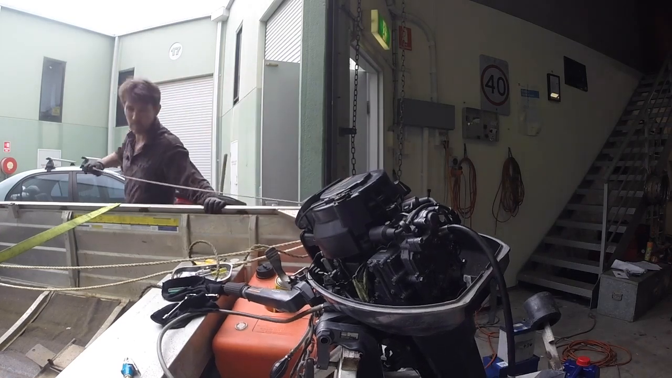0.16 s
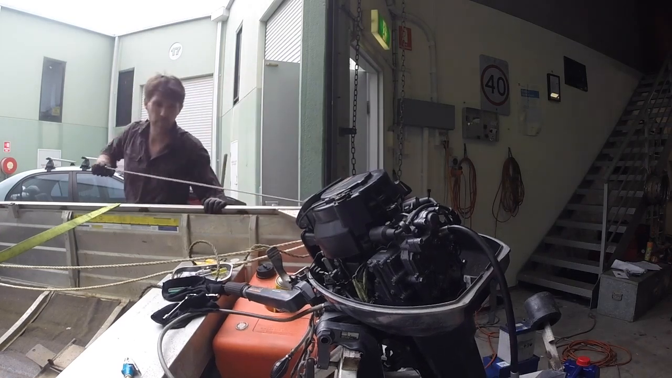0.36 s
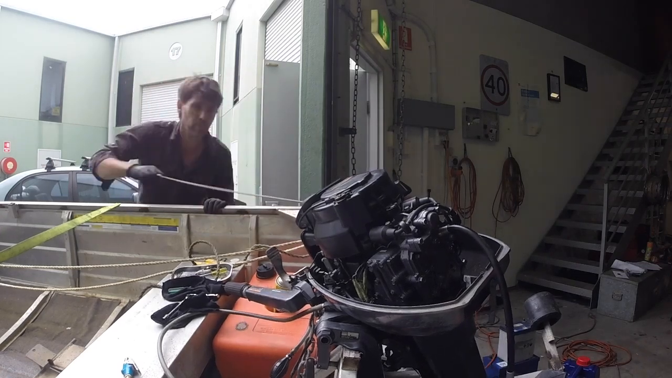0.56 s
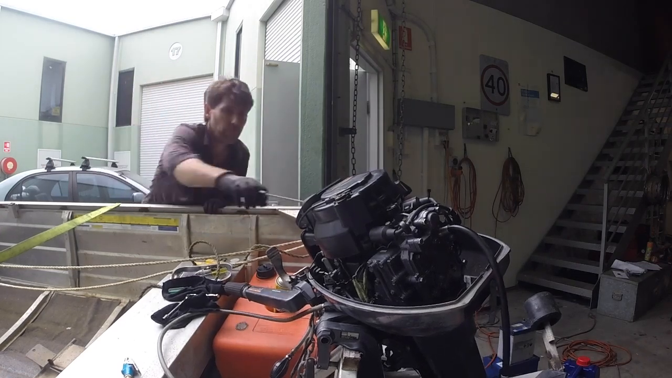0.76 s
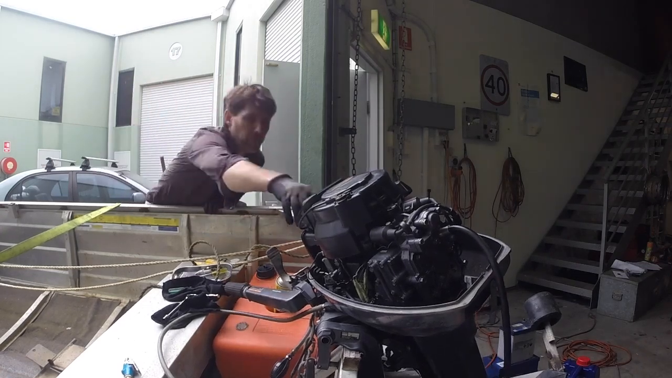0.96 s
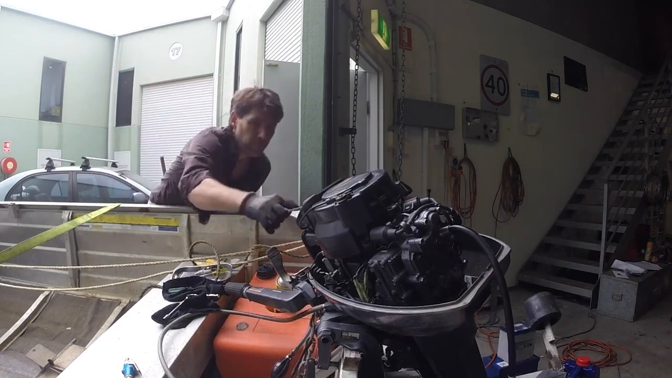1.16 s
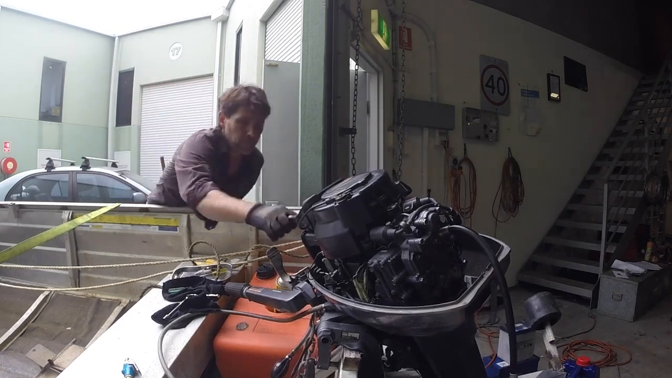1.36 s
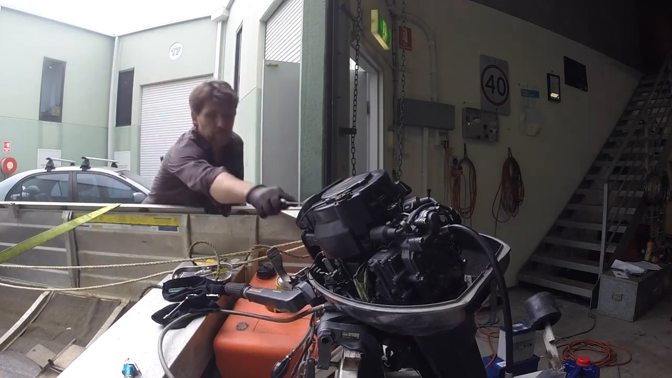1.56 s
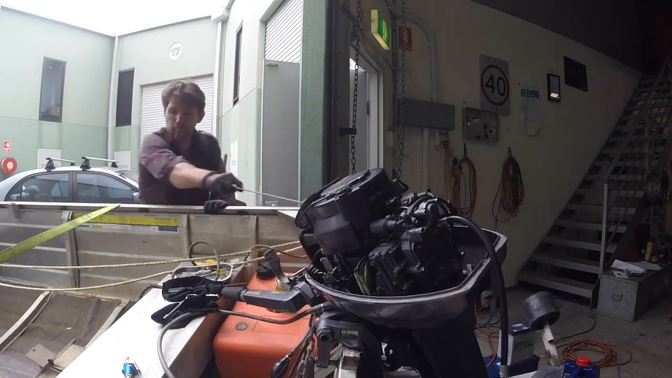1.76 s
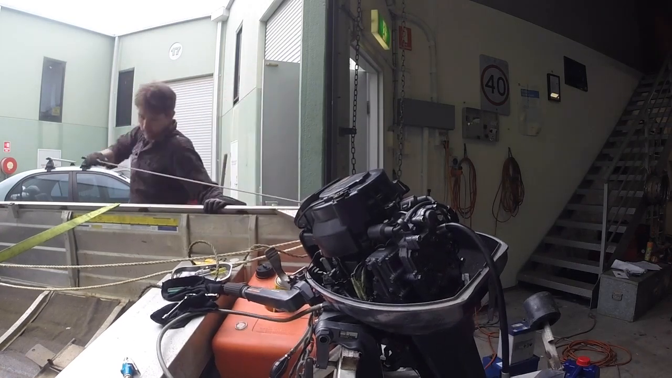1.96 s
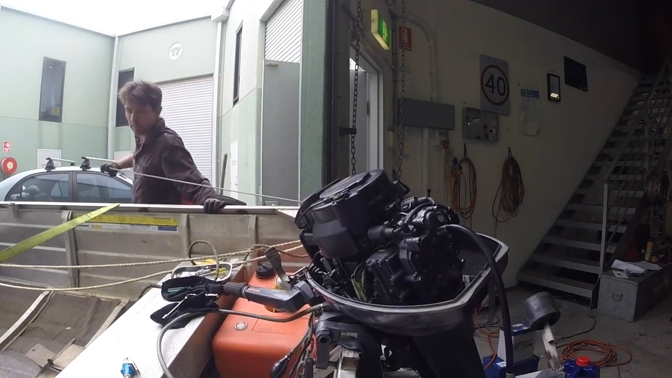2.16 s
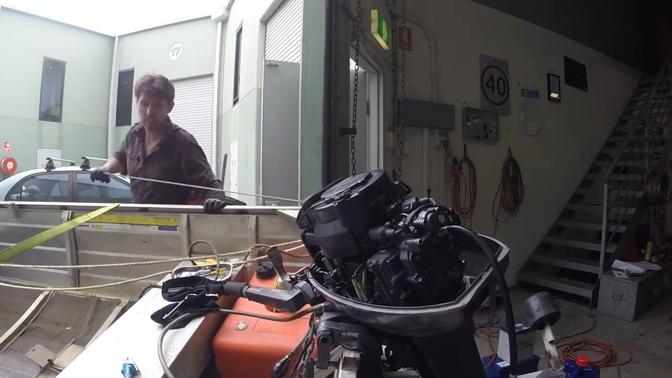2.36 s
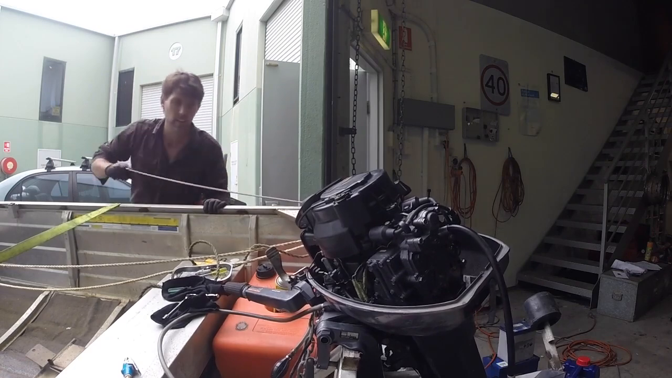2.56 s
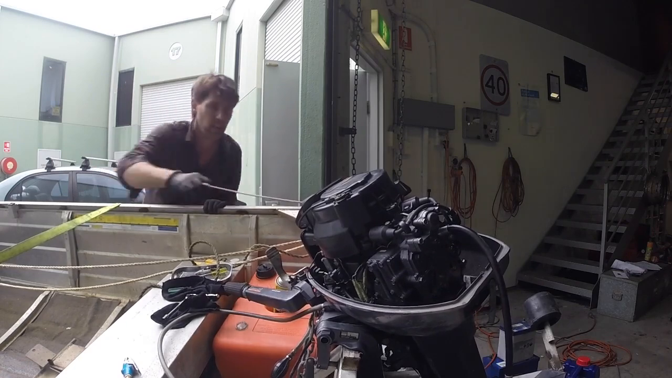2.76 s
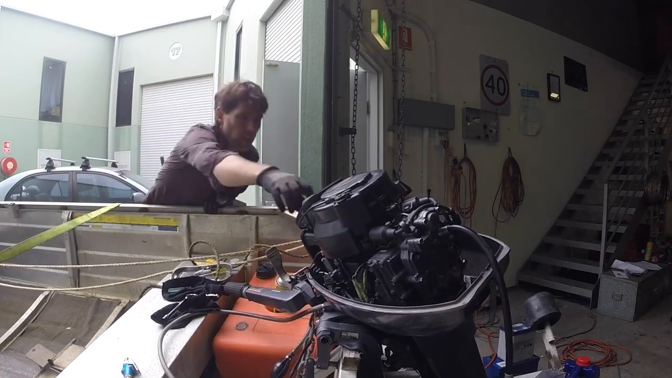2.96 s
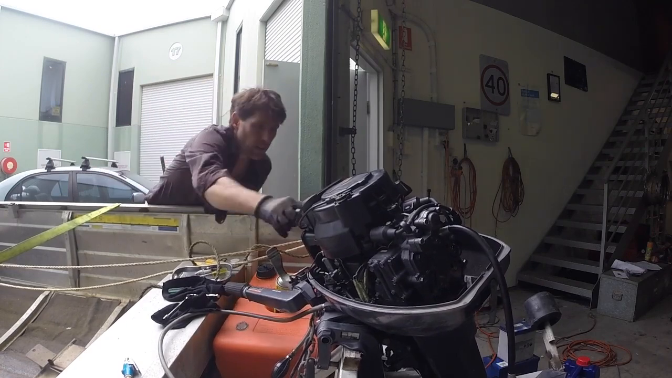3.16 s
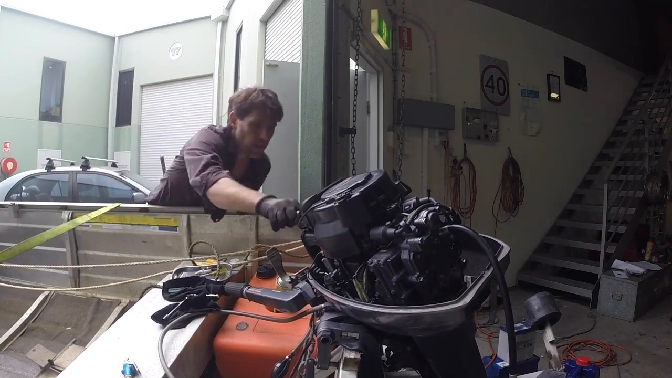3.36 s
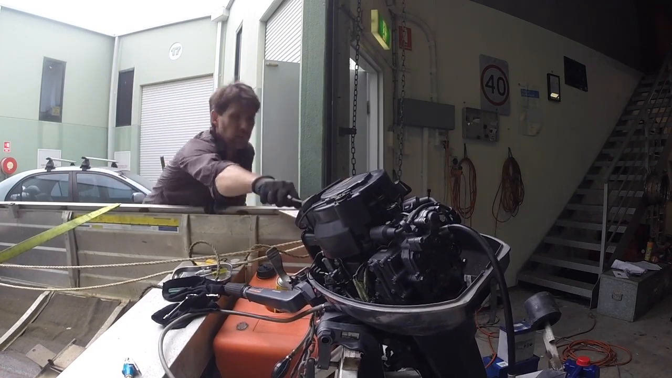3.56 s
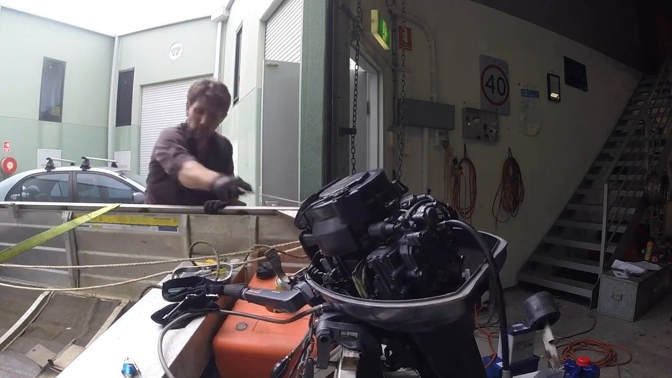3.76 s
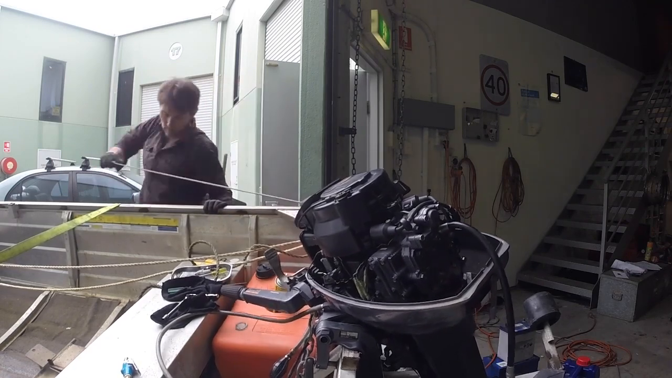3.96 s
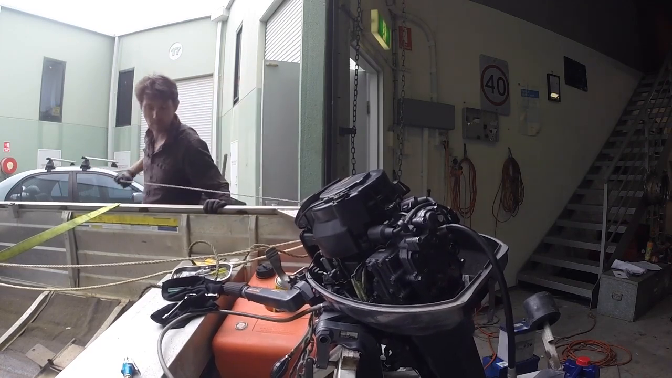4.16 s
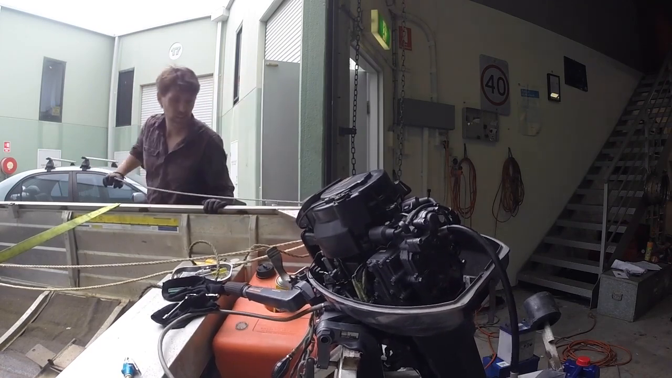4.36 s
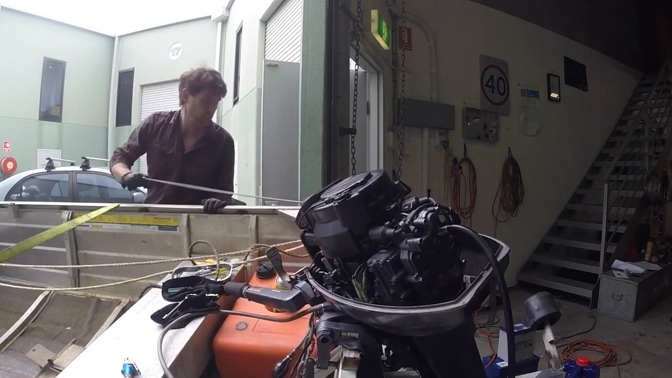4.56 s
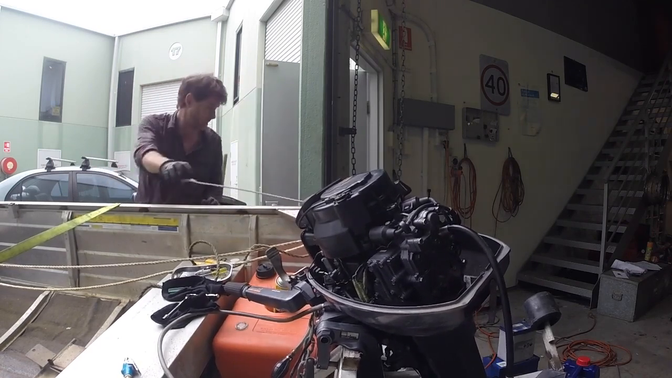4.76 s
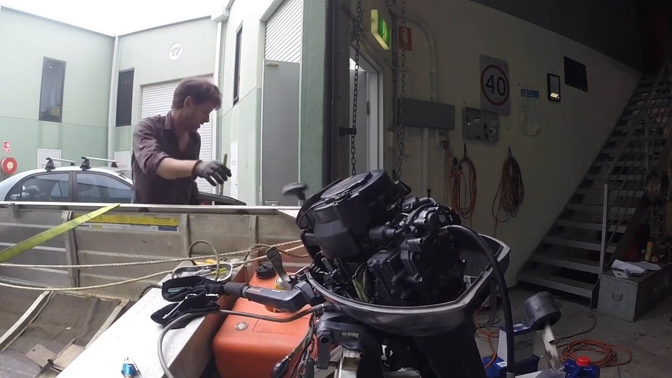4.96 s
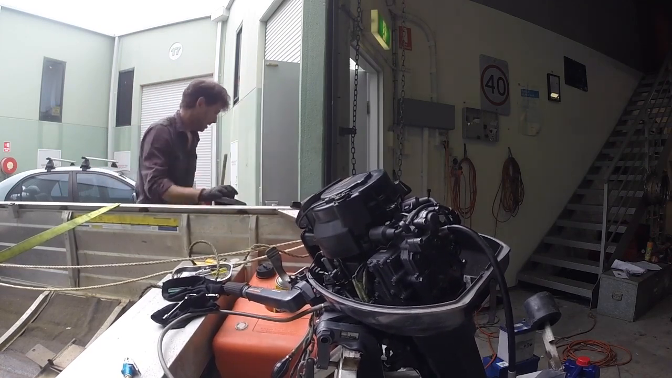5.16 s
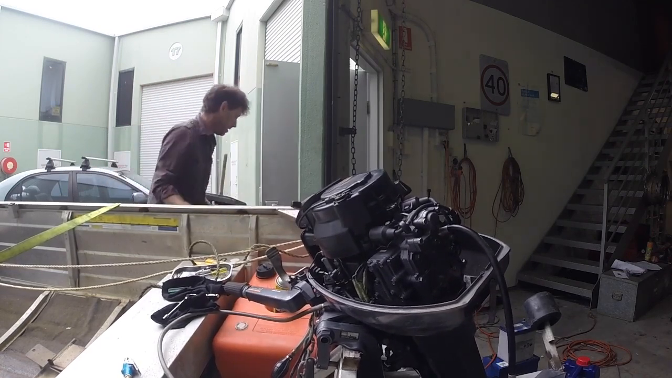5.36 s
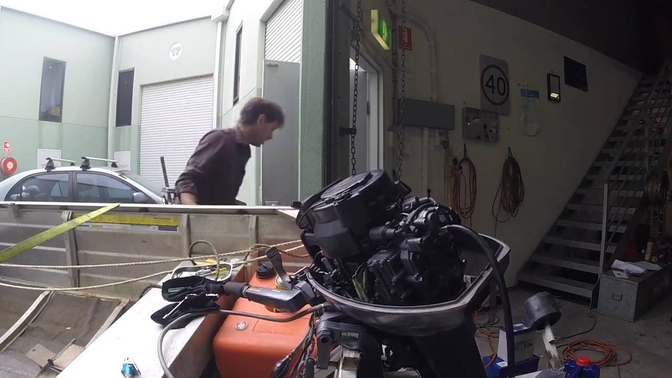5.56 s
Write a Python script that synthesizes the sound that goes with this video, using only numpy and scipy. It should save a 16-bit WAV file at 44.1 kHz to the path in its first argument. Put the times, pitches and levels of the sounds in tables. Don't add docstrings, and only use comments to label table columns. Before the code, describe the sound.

Three half-second starter-rope pulls, about two seconds apart, each with rapid pawl clacks, low compression pulses, dry bearing whine and a hard jolt. Between them come quieter rope and spring rattles, tiny jingles, brief squeaks and soft air sighs. The engine stays dead. A last hiss and a clunk ring on hull panels. Small close microphone, slightly overloaded, short hard-walled echo, faint yard rumble.

```python
import sys
import numpy as np
from scipy import signal
from scipy.fft import rfft, irfft, next_fast_len
from scipy.io import wavfile

SR = 44100
rng = np.random.default_rng(int(sys.argv[2]) if len(sys.argv) > 2 else 0)


def digitize_waveform(pressure):
    field = np.atleast_2d(pressure).T
    bounded = np.clip(field, -1, 1)
    quanta = np.round(bounded * 32767).astype(np.int16)
    wavfile.write(sys.argv[1], SR, quanta)


def gain_from_db(level_db):
    decades = np.asarray(level_db, float) / 20
    return 10 ** decades


N = 248139

# f/Hz, level/dB
AIR_SPECTRUM = [(29, -53), (50, -33), (177, -35.5), (285, -27.5), (449, -9.5), (1110, -9), (1220, -9.5),
                (2280, -14), (2960, -12), (5770, -22), (15000, -50.5)]
# t/s, peak level/dB, rebound delay/s, rebound level/dB
ROPE_JOLTS = [
    (0.163, -10, 0.0086, -4),
    (2.202, -8, 0.0058, -7),
    (4.239, -7, 0.0051, -8),
]
# t/s, clack level/dB, chuff level/dB, chuff f/Hz
CRANK_TURNS = [(0.024, -12, -30.5, 114), (0.1002, -5.5, -20, 133), (0.179, -25, -28, 125),
               (0.2829, -13, -18, 222), (2.02, -10.5, -13, 161), (2.108, -8, -14.5, 134),
               (2.1807, -10, -31.5, 129), (2.2567, -12, -29.5, 141), (2.353, -14.5, -20, 135),
               (2.5048, -20, -22, 164), (4.044, -13.5, -20.5, 144), (4.134, -19, -23, 122),
               (4.213, -11, -19, 122), (4.298, -10.5, -19, 151), (4.403, -45, -24, 171),
               (4.539, -55.5, -23, 154)]


def rms_one(x):
    return x / np.sqrt(np.mean(x ** 2) + 1e-20)


def in_time(tables, fade_s):
    t, gate = np.arange(N) / SR, np.zeros(N)
    for rows in tables:
        start = rows[0][0] if rows[0][0] > 0 else -1
        inside = np.minimum(t - start, rows[-1][0] - t)
        gate = np.maximum(gate, np.clip(inside / fade_s + .5, 0, 1))
    s, *columns = np.transpose([row for rows in tables for row in rows])
    s = s + 1e-6 * np.arange(len(s))
    return gate, [np.interp(t, s, c) for c in columns]


def drift(rate):
    r = np.exp(-2 * np.pi * 20 * rate / SR)
    slow = signal.lfilter([1], [1, -2 * r, r * r], rng.standard_normal(N // 20 + 2002))[2000:]
    return np.interp(np.arange(N) / 20, np.arange(len(slow)), rms_one(slow))


def resonance(x, hz, width_hz):
    r = np.exp(-np.pi * width_hz / SR)
    zeros = np.array([1, 0, -1]) * (1 - r * r) / 2
    return signal.lfilter(zeros, [1, -2 * r * np.cos(2 * np.pi * hz / SR), r * r], x + 1e-18)


def colour(x, spectrum):
    size = next_fast_len(N)
    hz = np.arange(1, size // 2 + 2) * SR / size
    points = np.array(spectrum)
    gain_db = np.interp(np.log(hz), np.log(points[:, 0]), points[:, 1])
    return irfft(rfft(x, size) * gain_from_db(gain_db), size)[:N]


def contacts(per_s, spread_db, smooth):
    sizes = gain_from_db(spread_db * np.minimum(rng.exponential(1, N), 5)) * rng.choice([-1, 1], N)
    return rms_one(sizes * (rng.random(N) < per_s / SR)) + smooth * rng.standard_normal(N)


def follow(law, control_db, load):
    slow = np.minimum(control_db, 0)
    return [db + per_db * control_db - bend * slow ** 2 + load_db * load
            for db, per_db, bend, load_db in law]


def played(x, gate, levels, edges_hz, patchy_db, flicker, shared, closing, top_db):
    last = levels[-1]
    levels = levels + [last + top_db + closing * (last - last.max())]
    out, together, size = 0, drift(flicker), next_fast_len(N)
    hz, whole = np.arange(1, size // 2 + 2) * SR / size, rfft(x, size)
    above = [1 / (1 + (edge / hz) ** 7) for edge in edges_hz]
    for low, high, level_db in zip(above, above[1:], levels):
        part = irfft(whole * (low - high), size)[:N]
        patches = gain_from_db(patchy_db * (shared * together + drift(flicker)))
        out = out + gain_from_db(level_db) * rms_one(part * patches)
    return np.sqrt(gate) * out


def body(x, modes, loose_db, flicker):
    out = x
    for hz, width, db in modes:
        mode = resonance(resonance(x, hz, width), hz, width)
        out = out + gain_from_db(db + loose_db * drift(flicker)) * mode
    return out


def struck(s, db, hz, t60, rise_s):
    t = np.arange(int(min(t60, .4) * SR)) / SR
    return int(s * SR), gain_from_db(db - 60 * t / t60) * (1 - np.exp(-t / rise_s)) * np.sin(2 * np.pi * hz * t)


def add(out, at, x):
    out[at:at + len(x)] += x[:N - at]


def background():
    # f/Hz, level/dB
    yard_spectrum = [(29, -46), (50, -5), (214, -0.5), (279, -5), (1220, -18.5), (1520, -15.5),
                     (1670, -16.5), (2330, -29), (15000, -39)]
    return gain_from_db(-62.5) * rms_one(colour(rng.standard_normal(N), yard_spectrum))


def yard(x):
    t60_s, wall_cut_hz = 0.64, 1460
    size = next_fast_len(N + SR)
    w = 2 * np.pi * np.arange(size // 2 + 1) / size
    dull = 1 / (1 + 1j * w * SR / (2 * np.pi * wall_cut_hz * 2.1))
    loops = 0
    for k, lag in enumerate(rng.uniform(.02, .06, 10) * SR):
        back = gain_from_db(-60 * lag / SR / t60_s) * dull * np.exp(-1j * w * int(lag))
        loops = loops + (-1) ** k * back / (1 - back)
    return irfft(rfft(x, size) * loops, size)[:N]


def hull():
    # f/Hz, level/dB, decay time T60/s
    panels = [(534, -39, .36), (828, -27.5, 0.25), (991, -27, 0.66), (1520, -34, .7), (1920, -43.5, 0.86),
              (2316, -36, 0.84), (2720, -47.5, 0.82), (3480, -40.5, 0.6), (3890, -42, 0.69),
              (4640, -42.5, 0.67), (5460, -47, 0.67)]
    drop_s, bounce_s = 5.114, .125
    t = np.arange(N) / SR - drop_s
    skitter = contacts(per_s=900, spread_db=2.5, smooth=.3) * (t > 0) * (t < bounce_s)
    out = 0
    for hz, db, t60 in panels:
        width_hz = np.log(1000) / np.pi / t60
        for near in 1 + .055 * rng.standard_normal(12):
            out = out + gain_from_db(db + 15.0) * resonance(skitter, hz * near, width_hz)
    return resonance(resonance(out, 1180, 3300), 1200, 3200)


def squeak():
    # t/s, length/s, level/dB, swell/dB
    squeaks = [
        (.443, 0.044, -31.5, 3),
        (0.557, 0.04, -25.5, -29),
        (1.778, 0.074, -30.5, 0),
        (3.795, 0.0173, -38.5, 0),
        (3.833, 0.024, -32, -3),
    ]
    passages = [[(s, db), (s + length, db + swell_db)] for s, length, db, swell_db in squeaks]
    gate, (level_db,) = in_time(passages, fade_s=0.0032)
    hz = 553 * (1 + 0.006 * drift(42))
    return np.sqrt(2) * gate * gain_from_db(level_db) * np.sin(2 * np.pi * np.cumsum(hz) / SR)


def jingles():
    # t/s, peak level/dB, f/Hz
    flicks = [(.462, -37, 11300), (.468, -42, 13200), (.47, -44, 10600), (.484, -40, 5470),
              (.485, -45, 6700), (.55, -39, 4700), (.556, -54, 8300), (.56, -48, 10900), (.634, -46, 5770),
              (.70, -47, 7200), (.744, -34, 4720), (.745, -41, 10900), (.766, -44, 14000),
              (.77, -43, 12500), (.838, -36, 3230), (.838, -40, 3800), (.869, -42, 6000), (.87, -50, 8500),
              (.88, -50, 11000), (.963, -40, 11400), (.963, -34, 7460), (0.981, -32, 6200),
              (1.243, -35, 2870), (1.243, -41, 6070), (1.257, -29, 3140), (1.257, -40, 7000),
              (1.296, -34, 3100), (1.298, -46, 5300), (1.778, -50, 6800), (1.785, -53, 11400),
              (1.79, -50, 3000), (1.81, -50, 6600), (2.704, -47, 6300), (2.775, -38, 10800),
              (2.78, -45, 6200), (2.803, -37, 5840), (2.805, -55, 13800), (2.82, -41, 10750),
              (2.855, -44, 14700), (2.855, -45, 12600), (2.86, -41, 4700), (2.928, -39, 3700),
              (2.94, -49, 12800), (2.965, -42, 10870), (3.055, -30, 7160), (3.058, -30, 5910),
              (3.072, -38, 6200), (3.838, -39, 3000), (3.852, -39, 11600), (3.862, -44, 5540),
              (4.775, -41, 6300), (4.975, -45, 10850), (5.0, -40, 10900), (1.243, -38, 11200),
              (1.275, -52, 11100), (1.8, -57, 13500), (2.487, -39, 11300), (2.524, -42, 9200),
              (4.418, -27, 6300), (4.49, -44, 10800)]
    t60_s, width_share = .085, .042
    t = np.arange(int(.09 * SR)) / SR
    out, chatter = np.zeros(N), rng.normal(0, 1, (len(flicks), len(t)))
    shape = gain_from_db(-9 - 60 * t / t60_s) * np.minimum(t / 0.0019, 1)
    for (s, db, hz), noise in zip(flicks, chatter):
        width_hz = width_share * hz
        ring = resonance(resonance(noise, hz, width_hz), hz, width_hz)
        add(out, int(s * SR), gain_from_db(db) * shape * rms_one(ring))
    return out


def sigh():
    # t/s, rise/s, hold/s, body level/dB, brightness/dB
    hisses = [
        (1.322, 0.017, 0.078, -30.5, 0.5),
        (3.335, 0.043, 0.065, -31, 1),
        (1.772, .004, .075, -66, 20),
        (3.818, 0.034, .045, -52.5, 15.5),
        (5.021, 0.006, 0.091, -30, 4),
        (5.106, .003, 0.039, -38, 9),
    ]
    # f/Hz, width/Hz, level/dB
    ports = [(1230, 240, -6), (1800, 300, -3.5), (3340, 1300, -4)]
    # level re body/dB, share of brightness, fall/(dB/s), tail level re start/dB,
    # share of the hold
    band_law = [(0.1, .0, 124, -25, 0.9), (-11, 0.4, 95.5, -19, 0.84), (-15, 0.74, 150.5, -22, 0.73),
                (-22, .99, 217.5, -26, 0.61)]
    air = colour(contacts(per_s=5000, spread_db=1.8, smooth=0.9), AIR_SPECTRUM)
    air = body(air, ports, loose_db=1.5, flicker=15)
    t, gate, power = np.arange(N) / SR, np.zeros(N), np.full((len(band_law), N), 1e-12)
    for s, rise, hold, db, bright_db in hisses:
        gate = np.maximum(gate, np.clip((t - s) / 0.0089 + .5, 0, 1) * (t < s + 1))
        opening_db = -20 * np.clip(1 - (t - s) / rise, 0, 9)
        for k, (re_db, share, fall, tail_db, held) in enumerate(band_law):
            after = np.maximum(t - s - rise - held * hold, 0)
            fading = gain_from_db(-2 * fall * after) + gain_from_db(2 * (tail_db - 33 * after))
            power[k] += gain_from_db(2 * (db + re_db + share * bright_db + opening_db)) * fading
    return played(air, gate, list(10 * np.log10(power)), [100, 2200, 5000, 9000, 12500, 16000],
                  patchy_db=1.5, flicker=28, shared=0.94, closing=0.49, top_db=-3.0)


def rewind():
    # t/s, level/dB
    drag = [
        [(0.48, -48.5), (0.64, -40.5), (0.75, -35), (0.86, -37.5), (0.94, -41.5), (1.0, -35.5), (1.03, -48),
         (1.1, -55.5), (1.22, -71)],
        [(1.242, -50.5), (1.26, -41), (1.288, -50), (1.3, -38.5), (1.335, -36.5)],
        [(1.772, -54), (1.79, -53), (1.83, -53), (1.87, -58)],
        [(2.58, -56), (2.75, -50), (2.79, -38.5), (2.92, -36.5), (3.04, -44.5), (3.07, -40.5), (3.1, -50),
         (3.2, -63), (3.33, -63.5)],
        [(4.58, -60), (4.66, -45), (4.7, -44.5), (4.8, -46), (4.86, -44.5), (4.93, -49), (4.98, -43.5),
         (5.02, -36)],
    ]
    # f/Hz, level/dB
    reel_spectrum = [(250, -20.5), (500, -15), (1400, -16), (2100, -14), (2900, -22), (5000, -25.5),
                     (7500, -37.5), (9500, -48.5), (15000, -49)]
    # f/Hz, width/Hz, level/dB
    reel_modes = [(579, 260, 3.5), (826, 270, -2.5), (1330, 395, 6), (1740, 440, 0), (2880, 1000, 7),
                  (4400, 960, -2), (6250, 1500, -1), (10860, 300, 11)]
    # level at full drag/dB, slope/(dB/dB), extra fall/(dB/dB^2), gain when wound/dB
    drag_law = [(-38, 0.95, .0, 0), (-45.5, 1, .0, -1.5), (-67, 1, 0.07, 12)]
    rub = contacts(per_s=2000, spread_db=2.2, smooth=.9)
    rub = body(colour(rub, reel_spectrum), reel_modes, loose_db=5.0, flicker=25)
    gate, (drum_db,) = in_time(drag, fade_s=0.018)
    _, (wound,) = in_time([[(run[0][0], 1), (run[-1][0], 0)] for run in drag], fade_s=1)
    turning = np.clip((drum_db + 60) / 9, 0, 1)
    tail = colour(rng.standard_normal(N), AIR_SPECTRUM)
    rub = turning * rms_one(rub) + (1 - turning) * rms_one(tail)
    full_drag_db = -38
    return played(rub, gate, follow(drag_law, drum_db - full_drag_db, wound), [300, 2000, 8500, 12000, 16000],
                  patchy_db=2.0, flicker=34, shared=0.73, closing=.05, top_db=-10)


def reeds():
    # t/s, peak level/dB
    snaps = [(0.0724, -21), (0.1125, -18), (0.15, -22), (0.2417, -30.5), (0.2587, -26), (0.3036, -22.5),
             (0.3899, -36), (1.9194, -37), (1.9954, -28), (2.0344, -21.5), (2.08, -23.5), (2.1187, -17),
             (2.1914, -16.5), (2.2704, -23), (2.3153, -24), (2.3434, -26), (2.367, -25), (2.3717, -20),
             (2.4021, -39), (2.4415, -38), (4.022, -19), (4.1037, -21), (4.1432, -14), (4.1831, -20.5),
             (4.3155, -22), (4.37, -27), (4.4515, -23), (0.036, -22.5), (0.195, -22), (5.114, -24),
             (4.2255, -19), (4.268, -23), (4.978, -49)]
    # t/s, f/Hz, level/dB
    whistles = [
        [(2.326, 10500, -46), (2.331, 14500, -40)],
        [(4.382, 9800, -46), (4.388, 12300, -41), (4.396, 13300, -41), (4.405, 11900, -45), (4.428, 11500, -54)],
    ]
    peak_s = .0007
    t = np.arange(300) / SR
    out, rough = np.zeros(N), rng.normal(0, 1, (len(snaps), len(t)))
    for (s, db), noise in zip(snaps, rough):
        add(out, int(s * SR), gain_from_db(db - 4) * noise * t / peak_s * np.exp(1 - t / peak_s))
    high_pass = signal.butter(3, 11000, "high", fs=SR, output="sos")
    bright = signal.sosfilt(high_pass, out + 1e-18)
    skirt = gain_from_db(-16) * resonance(out, 7000, 6000)
    gate, (hz, level_db) = in_time(whistles, fade_s=.003)
    phase = 2 * np.pi * np.cumsum(hz * (1 + .015 * drift(200))) / SR
    return bright + skirt + gate * gain_from_db(level_db + 4 * drift(146)) * np.sin(phase)


def whine():
    # t/s, f/Hz, level/dB
    pulled = [
        [(0, 1200, -27.5), (.024, 1225, -14), (.045, 1300, -20.5), (.058, 1470, -20), (.09, 1450, -26.5),
         (.12, 1330, -24), (.19, 1350, -28.5)],
        [(1.945, 800, -27.5), (1.97, 950, -28.5), (2.01, 1100, -27), (2.045, 1100, -36.5), (2.065, 1250, -16),
         (2.09, 1507, -15.5), (2.115, 1450, -24.5), (2.16, 1580, -31), (2.2, 1450, -18)],
        [(3.97, 800, -39.5), (4.02, 1050, -21.5), (4.06, 1100, -36.5), (4.09, 1250, -15), (4.115, 1400, -19),
         (4.135, 1450, -34), (4.2, 1450, -24.5)],
    ]
    # t/s, f/Hz, level/dB
    first_return = [(0.65, 1255, -56), (0.722, 1351, -42), (0.734, 1466, -50), (0.762, 1314, -45),
                    (0.816, 1578, -44), (0.872, 1455, -47), (0.886, 1330, -40), (0.95, 1337, -49)]
    second_return = [(2.76, 1285, -51), (2.809, 1425, -41.5), (2.83, 1343, -44), (2.878, 1506, -43),
                     (2.93, 1558, -45), (2.968, 1320, -49), (2.986, 1325, -36), (3.03, 1275, -53)]
    passages = sorted(pulled + [first_return, second_return], key=lambda rows: rows[0][0])
    gate, (hz, level_db) = in_time(passages, fade_s=.01)
    phase = 2 * np.pi * np.cumsum(hz * (1 + .015 * drift(70))) / SR
    awake = np.clip((hz - 1100) / 250, 0, 1)
    octave = gain_from_db(-11.0 + 3.3 * drift(73)) * awake * np.sin(2 * phase)
    return np.sqrt(2) * gate * gain_from_db(level_db) * (gain_from_db(3.5 * drift(58)) * np.sin(phase) + octave)


def crank():
    # t/s, level/dB
    speed = [
        [(0, -28.5), (0.1, -26), (0.2, -27.5), (0.3, -34.5), (0.38, -37), (0.47, -44.5), (0.6, -53)],
        [(1.87, -67), (1.9, -50.5), (1.93, -34), (1.98, -29.5), (2.22, -26), (2.3, -31), (2.48, -39),
         (2.56, -49), (2.75, -56.5)],
        [(3.79, -67.5), (3.925, -58), (3.95, -38.5), (4.0, -31), (4.12, -27), (4.25, -26), (4.44, -37),
         (4.51, -45.5), (4.63, -56)],
    ]
    # f/Hz, level/dB
    crank_spectrum = [(29, -36), (50, -14.5), (130, -7), (307, -11.5), (759, 1), (2020, -13), (2820, -19),
                      (5000, -25.5), (6200, -15.5), (15000, -14)]
    # f/Hz, width/Hz, level/dB
    housing = [(451.5, 214, 2.5), (800, 180, -0.5), (1004, 140, 1), (1400, 770, -3.5), (3000, 240, -8.5),
               (6300, 290, -6.5), (9200, 300, -7.5), (11000, 500, -5.5)]
    # level at full speed/dB, slope/(dB/dB),
    # extra fall when slow/(dB/dB^2), gain under rope load/dB
    speed_law = [(-27, 0.63, 0.02, -0.45), (-25, 0.66, .0, 4.5), (-27.5, 1.08, .0, 0.04),
                 (-38, 1.12, 0.013, -3)]
    full_speed_db, slacken_s = -27, 0.13
    rub = colour(contacts(per_s=2500, spread_db=2.0, smooth=0.83), crank_spectrum)
    rub = body(rub, housing, loose_db=5, flicker=35)
    gate, (speed_db,) = in_time(speed, fade_s=0.015)
    loads = [[(pull[0][0], 1), (s, 1), (s + slacken_s, 0), (pull[-1][0], 0)]
             for pull, (s, *_) in zip(speed, ROPE_JOLTS)]
    _, (load,) = in_time(loads, fade_s=1)
    return played(rub, gate, follow(speed_law, speed_db - full_speed_db, load),
                  [35, 330, 2000, 5000, 11000, 16000],
                  patchy_db=2.0, flicker=34.0, shared=.8, closing=.1, top_db=-0.5)


def chuffs():
    # t/s, peak level/dB, f/Hz
    thumps = [(1.03, -31, 141), (1.352, -30, 185), (1.385, -31, 180), (1.44, -43, 120), (1.892, -25.5, 171),
              (1.976, -12.5, 256), (3.381, -33, 172), (3.481, -39, 126), (3.876, -33, 147),
              (3.976, -32, 93), (5.107, -33, 190)]
    lead_s, quick_turn_s = 0.004, .089
    out, times = np.zeros(N), np.array(CRANK_TURNS)[:, 0] - lead_s
    first = [(at, db, hz) for at, (_, _, db, hz) in zip(times, CRANK_TURNS)]
    second = [((a + b) / 2, -28, 102) for a, b in zip(times, times[1:]) if b - a < quick_turn_s]
    for s, db, hz in first + second + thumps:
        add(out, *struck(s, db + 16.0, hz, t60=2.5 / hz + .022, rise_s=0.015))
    return out


def knocks():
    # t/s, peak level/dB, f/Hz
    hard = [(0.058, -13.5, 495), (0.074, -6.5, 865), (0.134, -14, 750), (0.152, -11.5, 870),
            (0.167, -7, 630), (0.265, -14.5, 526), (1.915, -26.5, 737), (1.949, -21, 780),
            (1.969, -10.5, 853), (2.005, -16.5, 1064), (2.082, -12.5, 1440), (2.099, -7.5, 695),
            (2.156, -9.5, 800), (2.204, -7.5, 441), (2.231, -11, 763), (2.32, -12, 817),
            (3.9635, -19, 1504), (3.973, -19, 700), (3.987, -14.5, 618), (4.004, -8.5, 552),
            (4.105, -7, 743), (4.184, -10, 784), (4.238, -4.5, 1303), (4.266, -12, 765),
            (4.367, -16.5, 890)]
    # t/s, peak level/dB, f/Hz
    raps = [(0.336, -19, 540), (0.375, -15, 547), (0.394, -17.5, 865), (0.443, -20.5, 530),
            (0.7, -36, 1330), (0.793, -33, 584), (1.006, -32.5, 1004), (1.258, -27.5, 1210),
            (1.775, -22.5, 513), (1.778, -33, 800), (1.791, -33.5, 409), (2.41, -22, 553), (2.43, -15, 537),
            (2.446, -13.5, 863), (2.477, -16.5, 543), (2.506, -19, 810), (2.583, -20, 539),
            (2.658, -23.5, 890), (3.077, -29.5, 1820), (3.143, -41.5, 415), (3.34, -30.5, 590),
            (3.822, -35, 800), (3.836, -22, 560), (3.843, -23, 540), (3.855, -29, 639), (3.875, -23, 776),
            (4.498, -19.5, 541), (4.524, -19.5, 560), (4.605, -25.5, 991), (4.717, -27, 1800),
            (4.805, -36, 1330), (5.052, -18, 1460), (5.113, -13, 752)]
    out, chance = np.zeros(N), rng.normal(0, 1, (len(hard + raps), 4))
    rises_s = [.0018] * len(hard) + [.0012] * len(raps)
    for (s, db, hz), c, rise in zip(hard + raps, chance, rises_s):
        t60 = 0.025 + 6.1 / hz
        add(out, *struck(s, db + 4.5, hz, t60, rise_s=rise))
        add(out, *struck(s, db - 5.5 + 2 * c[0], hz * (1.45 + .1 * c[1]), t60 * 1.33, rise_s=0.93 * rise))
        add(out, *struck(s, db - 5.5 + 2 * c[2], hz * (0.767 + 0.089 * c[3]), t60 * 1.21, rise_s=0.6 * rise))
    return out


def clacks():
    # f/Hz, width/Hz, level/dB
    pawl_modes = [(2850, 485, 1.5), (3500, 430, -4), (5550, 380, -15.5), (6280, 730, -2.5),
                  (7400, 890, -14), (9400, 310, -11.5), (11300, 340, -1), (14300, 1200, -6.5)]
    # t/s, peak level/dB, brightness/octaves re 6.3 kHz
    ticks = [(.461, -41, .8), (.4847, -41, 0.39), (0.55, -33, -1.1), (.6335, -35, -.6), (.763, -30, -0.15),
             (.836, -27, -.9), (0.9643, -29, 0.062), (0.981, -30, -0.28), (1.243, -31, .7),
             (1.2573, -20, -0.93), (1.968, -13.5, -0.38), (1.974, -17, -.8), (2.1296, -21, -0.12),
             (2.153, -23, .9), (2.2287, -11.5, -0.089), (2.5, -31, .3), (2.514, -34, .8),
             (2.6597, -53, 0.1), (2.778, -40, 0.1), (2.802, -34, -0.38), (2.9282, -35, -0.64),
             (3.055, -34.5, -0.65), (3.073, -46, -.4), (3.309, -41, .9), (3.3399, -26.5, -.6),
             (3.7953, -58, -.1), (3.834, -40, 0.33), (3.8734, -27, 0.51), (3.892, -38, 0.75),
             (3.942, -34, 1.2), (4.152, -17, -.2), (4.4492, -29, 1.2), (4.775, -39.5, -0.18),
             (5.027, -23, -0.5), (5.034, -28, 0.17), (5.0467, -20, -0.24), (5.113, -18, -0.34)]
    turns = [(s, db, .55) for s, db, *_ in CRANK_TURNS]
    jolts = []
    for s, db, lag, again_db in ROPE_JOLTS:
        jolts += [(s, db, -.1), (s + lag, again_db, -.1)]
    s, peak_db, octave = np.transpose(turns + jolts + ticks)
    chatter, out = contacts(per_s=9000, spread_db=1.0, smooth=0.62), 0
    t = np.arange(1200) / SR
    shape = np.exp(-t / 0.0042) * np.minimum(t / 0.0008, 1)
    chance = rng.normal(0, 1, (len(s), len(pawl_modes)))
    for k, (hz, width, db) in enumerate(pawl_modes):
        hits = np.zeros(N)
        away = np.log2(hz / 6300) - octave
        where_db = np.minimum(-15.5 * away, 4.5 * away)
        hits[(s * SR).astype(int)] = gain_from_db(peak_db + db + where_db + 2.5 * chance[:, k])
        wide = resonance(signal.fftconvolve(hits, shape)[:N] * chatter, hz, 3 * width)
        out = out + gain_from_db(6) * resonance(wide, hz, width) + gain_from_db(-3.5) * resonance(wide, hz, 3.8 * width)
    return out


def scene():
    puffs = chuffs()
    blows = clacks() + knocks() + puffs + whine()
    echo = gain_from_db(-17.5) * yard(blows - 0.51 * puffs)
    rubbing = crank() + rewind() + sigh()
    small = squeak() + jingles() + reeds()
    return (blows + echo + rubbing + background() + hull() + small)[None]


def band_limit(x):
    return signal.sosfilt(signal.butter(12, 16620, fs=SR, output="sos"), x)


def record(dry):
    x = dry - 0.42 * resonance(dry, 2270, 500)
    x = 1.168 * np.tanh(x / 1.259)
    x = signal.sosfilt(signal.butter(2, 50, "high", fs=SR, output="sos"), x)
    x = signal.sosfilt(signal.cheby2(12, 50, 16000, fs=SR, output="sos"), x)
    return band_limit(x)


dry = scene()
out = record(dry)
digitize_waveform(out)
```